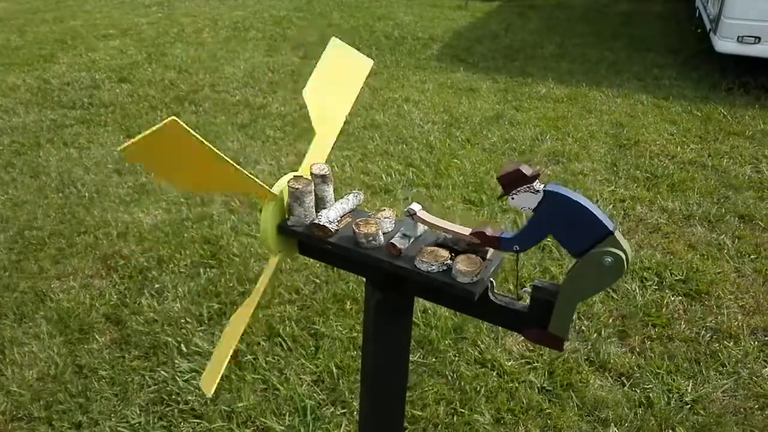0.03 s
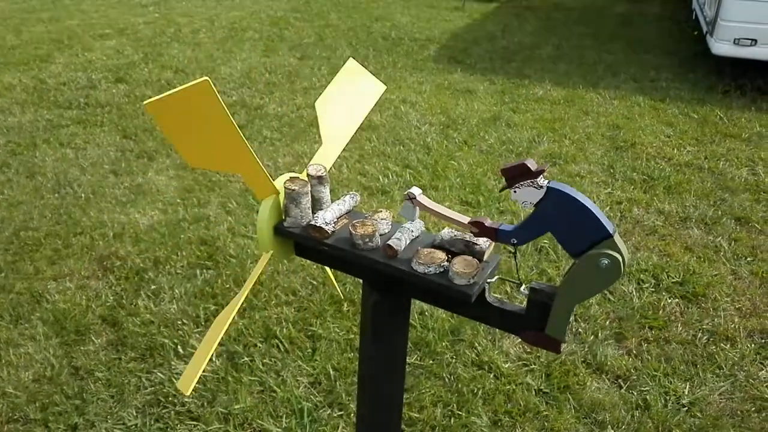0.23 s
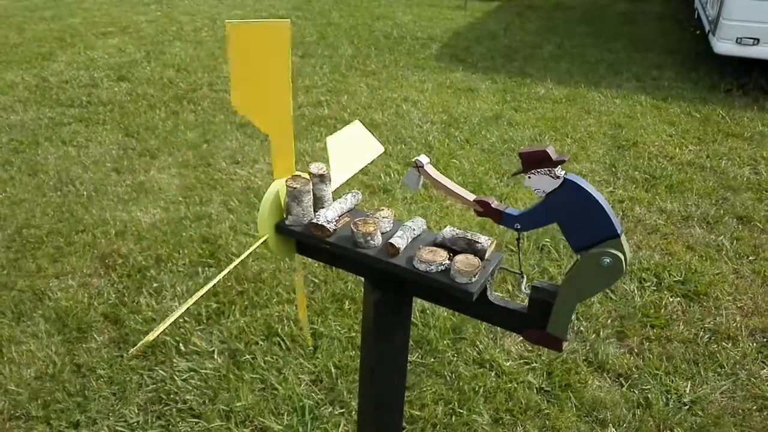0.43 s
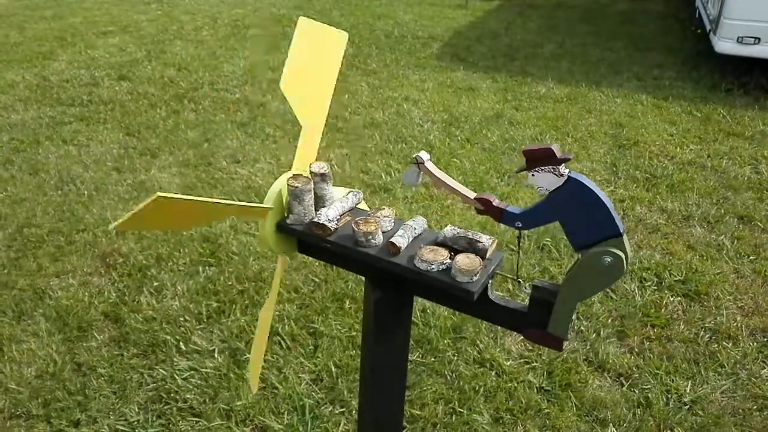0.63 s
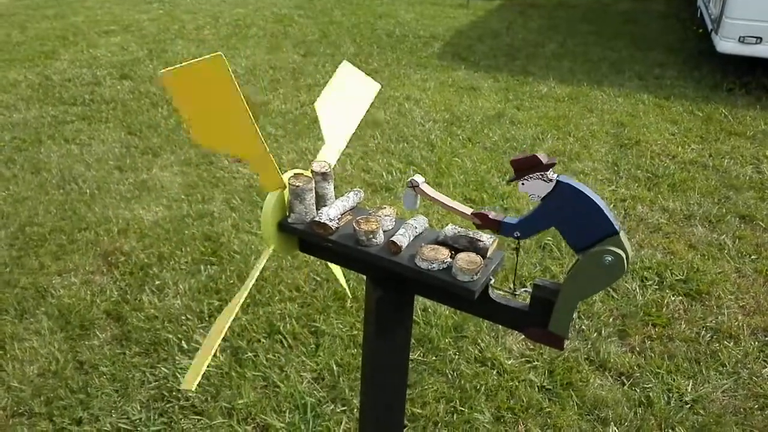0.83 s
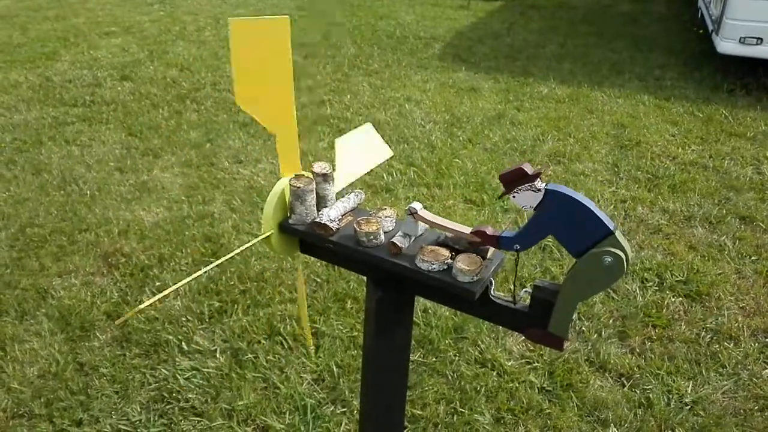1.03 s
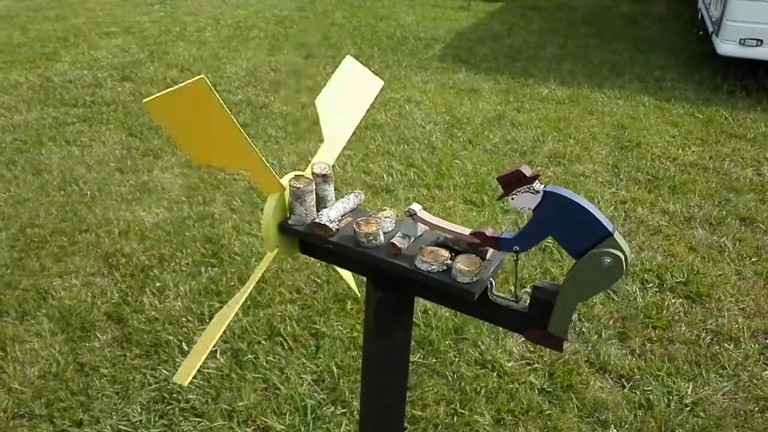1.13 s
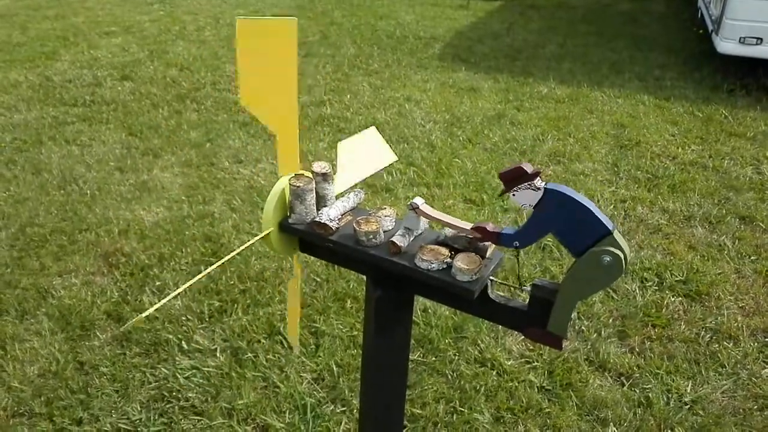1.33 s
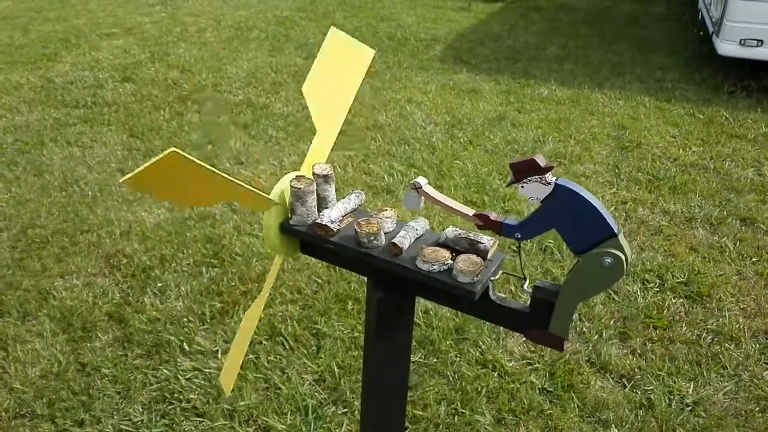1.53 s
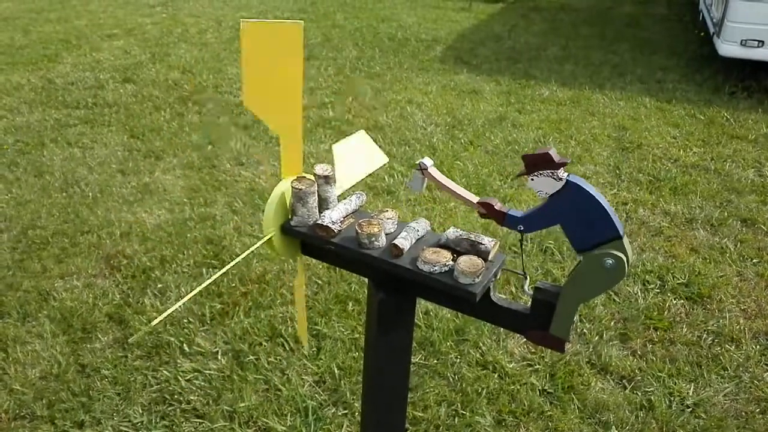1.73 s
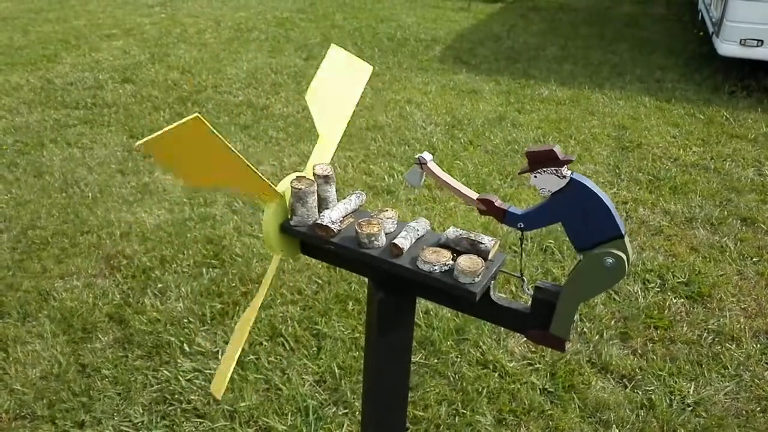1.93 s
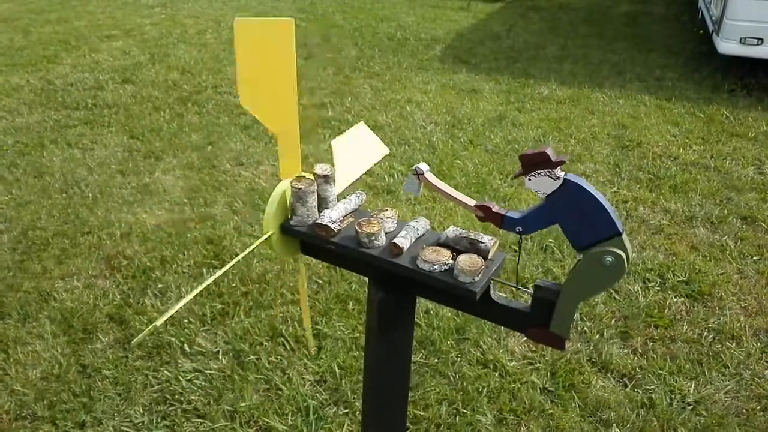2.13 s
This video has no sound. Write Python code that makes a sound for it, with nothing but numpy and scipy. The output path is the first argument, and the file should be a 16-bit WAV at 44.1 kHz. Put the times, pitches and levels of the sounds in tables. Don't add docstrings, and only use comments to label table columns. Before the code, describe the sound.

Wind buffeting bare microphones in low thumps and sharp slaps, over insect hiss and wooden clicks

```python
import sys
import numpy as np
from scipy import signal
from scipy.fft import rfft, irfft
from scipy.io import wavfile
from scipy.ndimage import uniform_filter1d, map_coordinates

SR = 44100
rng = np.random.default_rng(int(sys.argv[2]) if len(sys.argv) > 2 else 0)


def ratio_of_db(decibels):
    return 10 ** (np.asarray(decibels, float) / 20)


def generate_wav(sig):
    pcm = np.round(np.clip(np.atleast_2d(sig).T, -1, 1) * 32767).astype(np.int16)
    wavfile.write(sys.argv[1], SR, pcm)


N = 97020


def walk(rate):
    hold = int(SR / rate)
    levels = np.repeat(rng.standard_normal(N // 50), hold)[:N]
    return 1.3 * uniform_filter1d(uniform_filter1d(levels, hold), hold)


def band_noise(low_hz, high_hz, noise):
    return signal.sosfilt(signal.butter(2, [low_hz, high_hz], "band", fs=SR, output="sos"), noise)


def bands(table, wobble_db, rate, steps):
    swell_db, swell_rate = 0.25, 2.17
    hz = np.maximum(np.arange(N // 2 + 1) * SR / N, 1)
    f, db = np.array(table, float).T
    density = ratio_of_db(np.interp(np.log(hz), np.log(f), db))
    spec = rfft(rng.standard_normal(N)) * density * np.sqrt(SR / 2)
    place = np.log(hz / f[0]) / np.log(f[-1] / f[0]) * steps
    spec = spec * (place > -1) * (place < steps + 0.5)
    out = np.zeros(N)
    for k in range(steps + 1):
        share = np.clip(1 - abs(np.clip(place, 0, steps) - k), 0, 1)
        level = ratio_of_db(wobble_db * walk(rate) + swell_db * walk(swell_rate))
        out += irfft(spec * np.sqrt(share), N) * level
    return out


def traffic():
    # pitch_hz, density_db (per Hz)
    town = [(250, -91), (450, -98), (700, -87), (930, -94), (1080, -101), (1600, -101), (2500, -104.5),
            (4500, -108)]
    alike = 0.3
    mid = bands(town, 1.5, 12.76, steps=7)
    side = bands(town, 1.5, 12.76, steps=7)
    return np.sqrt((1 + alike) / 2) * mid + np.sqrt((1 - alike) / 2) * side * np.array([[1], [-1]])


def grass_insects():
    # pitch_hz, density_db (per Hz)
    hiss_left = [(4300, -106), (5000, -99), (5600, -88), (6600, -95), (9000, -101), (9700, -107),
                 (12500, -107), (14000, -104)]
    # pitch_hz, density_db (per Hz)
    hiss_right = [(5800, -108), (6300, -98), (7300, -94), (7800, -91), (8900, -84.5), (9400, -99.5),
                  (9900, -107), (14000, -114)]
    # pitch_hz, level_db
    whines = [
        (7063, -79.5),
    ]
    throb_db, throb_rate = 2.5, 35
    t = np.arange(N) / SR
    out = np.array([bands(hiss, throb_db, throb_rate, steps=10) for hiss in (hiss_left, hiss_right)])
    for hz, db in whines:
        out += ratio_of_db(db + 7.5 + 2 * walk(11.0)) * np.sin(2 * np.pi * hz * t)
    return out


def katydids():
    # pitch_hz, width_hz, level_db, rasps_per_s, a_rasp_at_s, duty (share of a cycle)
    rasps = [
        (7800, 190, -55, 12.6, 1.025, 0.3),
        (8900, 500, -56, 12.6, 0.99, 0.3),
        (8350, 400, -59, 12.6, 1.008, .3),
    ]
    t = np.arange(N) / SR
    out = np.zeros(N)
    for hz, width, db, rate, at, duty in rasps:
        band = band_noise(hz - width / 2, hz + width / 2, rng.standard_normal(N))
        turn = (rate * (t - at) + 0.054 * walk(6.7) + 0.5) % 1 - 0.5
        stroke = np.exp(-(2 * turn / duty) ** 2)
        out += ratio_of_db(db + 1.4 * walk(4.6)) * stroke * band / band.std()
    return out * np.array([[0.15], [1]])


def cicada():
    # centre_s, half_length_s, level_db, pitch_hz, width_hz
    swell = (1.03, .09, -55.5, 6400, 1100)
    at, half, db, hz, width = swell
    t = np.arange(N) / SR
    band = band_noise(hz - width / 2, hz + width / 2, rng.standard_normal((2, N)))
    return ratio_of_db(db) * np.exp(-((t - at) / half) ** 2) * band / band.std()


def whirligig_knocks():
    # start_s, level_db, body (0 dull, 1 bright)
    knocks = [
        (0.0127, -34, 0),
        (0.0207, -28.5, 1),
        (0.0232, -39.5, 1),
        (0.0409, -50, 1),
        (0.048, -45.5, 1),
        (1.106, -40.5, 0),
        (1.112, -46, 0),
        (1.125, -45.5, 0),
        (1.131, -46.5, 0),
        (1.143, -47, 1),
    ]
    # pitch_hz, level_db, t60_s
    dull_modes = [(845, -16, 0.066), (1556, -7.5, 0.048), (2117, -5, 0.011), (3820, -7, 0.014),
                  (4980, -9, 0.018)]
    # pitch_hz, level_db, t60_s
    bright_modes = [(540, -36, 0.075), (1175, -18.5, 0.055), (1760, -6, 0.016), (4110, -5.5, 0.022),
                    (5170, -1, 0.02), (6630, -1, 0.014), (7720, -3.5, 0.019)]
    low_pan_db, high_pan_db = 9, -9.5
    rattle_db, rattle_s, rattle_pan_db = 0.5, 0.004, 2
    rattle_top_hz = (4140, 8800)
    left_lag = 4
    sides = np.array([[0.5], [-0.5]])
    out, t = np.zeros((2, N)), np.arange(SR // 10) / SR
    for at, db, body in knocks:
        body = int(body > 0.5)
        seed = rng.standard_normal((2, len(t)))
        ring = 0
        for k, (hz, mode_db, t60) in enumerate((dull_modes, bright_modes)[body]):
            pan_db = low_pan_db if hz < 6000 else high_pan_db
            detuned = hz * (1 + 0.035 * seed[0, k])
            decay = np.exp(-np.log(1000) * t / t60)
            ring = ring + ratio_of_db(mode_db + pan_db * sides) * np.sin(2 * np.pi * detuned * t) * decay
        rattle = band_noise(900, rattle_top_hz[body], seed * np.exp(-t / rattle_s))
        i = int(at * SR)
        out[:, i:i + len(t)] += ratio_of_db(db) * (ring + ratio_of_db(rattle_db + rattle_pan_db * sides) * rattle)
    out[0] = np.roll(out[0], left_lag)
    return out


def squeaks():
    # centre_s, half_length_s, level_db, pitch_hz
    chirps = [(0.057, 0.0019, -39, 5200), (0.067, .004, -48, 5600), (0.046, .003, -43.5, 5300),
              (0.13, 0.0065, -60.5, 2900), (1.128, 0.0028, -50, 5660), (1.137, 0.0033, -54, 5600),
              (1.152, 0.0026, -48, 5600), (1.639, 0.0049, -52.5, 6400), (0.11, 0.01, -65.5, 2370),
              (2.4, 0.029, -67.5, 1573), (2.09, .012, -65, 1600), (2.13, 0.027, -69.5, 1700),
              (2.144, 0.0069, -63.5, 3380), (1.6, .005, -66, 3380), (1.9, 0.033, -69.5, 3800),
              (2.5, 0.018, -64.5, 1608)]
    pan_db, waver_rad = 11, 1.1
    t = np.arange(N) / SR
    out = np.zeros(N)
    for at, half, db, hz in chirps:
        level = ratio_of_db(db + 2 * walk(150)) * np.exp(-((t - at) / half) ** 2)
        out += level * np.sin(2 * np.pi * hz * t + waver_rad * walk(150))
    return out * ratio_of_db(np.array([[pan_db], [-pan_db]]) / 2)


def low_cut(x):
    cut_hz, width_hz = 71.1, 91.2
    w, q = 2 * np.pi * cut_hz, cut_hz / width_hz
    b, a = signal.bilinear([1, 0, 0], [1, w / q, w * w], SR)
    for _ in range(3):
        x = signal.lfilter(b, a, x)
    return x


def turbulence(puffs):
    calm_db, calm_hz, wind_db = -51.5, 119.72, -0.5
    corner_per_hz, corner_from_hz = 0.85, 50
    flutter_db, flutter_rate = 2.5, 130
    even, even_s = 0.78, 0.024
    t = np.arange(N) / SR
    s, half, db, hz = np.array(puffs, float).T[:, :, None]
    power = ratio_of_db(2 * db) * np.exp(-((t - s) / half) ** 2)
    total = power.sum(0) + ratio_of_db(2 * calm_db)
    pitch = ((power * hz).sum(0) + ratio_of_db(2 * calm_db) * calm_hz) / total
    speed = corner_per_hz * np.maximum(pitch - corner_from_hz, 10) * ratio_of_db(flutter_db * walk(flutter_rate))
    size = 2 ** 14
    fade = np.exp(-np.arange(size // 2 + 1) / size * 32)
    field = irfft(rfft(rng.standard_normal(size)) * fade, size)
    air = low_cut(map_coordinates(field, [np.cumsum(speed) * 32 / SR], mode="wrap"))
    span = int(even_s * SR)
    local = uniform_filter1d(uniform_filter1d(air ** 2, span), span) + 1e-12
    air = air / local ** (even / 2)
    slow = uniform_filter1d(air ** 2, SR // 2)
    return ratio_of_db(wind_db) * air * np.sqrt(total / slow)


def slaps(eddies):
    slap_db, edge = -23, 1.08
    t = np.arange(N) / SR
    out = np.zeros(N)
    for at, db, ms in eddies:
        lean = rng.uniform(0, 2 * np.pi)
        u = (t - at) * 1000 / max(ms, 0.05)
        out += ratio_of_db(db + slap_db) * (np.cos(lean) + np.sin(lean) * 2 * u) * np.exp(-edge * u * u)
    return low_cut(out)


def wind():
    # centre_s, half_length_s, level_db, eddy_pitch_hz
    left_puffs = [(0.255, 0.02, -28, 134), (0.339, 0.071, -34, 129.7), (0.408, 0.013, -35, 144.7),
                  (0.494, 0.014, -26.5, 146.4), (0.559, 0.022, -25.5, 125.6), (0.608, 0.022, -32.5, 115.3),
                  (0.749, 0.023, -17, 162.8), (0.854, 0.049, -17.5, 202.5), (0.969, 0.025, -20, 197),
                  (1.044, 0.018, -20, 191.4), (1.097, 0.018, -15.5, 232.6), (1.183, 0.097, -22, 239.5),
                  (1.274, 0.018, -18.5, 283.6), (1.321, 0.024, -14.5, 220.2), (1.368, 0.014, -13, 253.4),
                  (1.404, 0.014, -12.5, 312.1), (1.44, 0.006, -23.5, 231.9), (1.49, 0.019, -22.5, 215.3),
                  (1.541, 0.12, -40, 220.8), (1.585, 0.013, -37.5, 106.6), (1.677, 0.017, -14, 131.4),
                  (1.708, 0.045, -17.5, 132.7), (1.847, 0.029, -25, 144.4), (2.071, 0.018, -30, 129.7),
                  (2.127, 0.12, -38.5, 134.9), (2.147, 0.012, -31.5, 137)]
    # centre_s, half_length_s, level_db, eddy_pitch_hz
    right_puffs = [(0.055, 0.0091, -26.5, 132.5), (0.11, 0.056, -35, 128.2), (0.261, 0.02897, -20, 118.3),
                   (0.322, 0.007, -17, 229.9), (0.366, 0.018, -25.5, 142.9), (0.465, 0.046, -36.5, 125.7),
                   (0.575, 0.01215, -26.5, 91.74), (0.681, 0.011, -19, 118.4), (0.773, 0.011, -22.5, 107),
                   (0.788, 0.0958, -26, 119.7), (0.841, 0.01815, -28.5, 147), (1.027, 0.017, -20.5, 130.7),
                   (1.07, 0.0942, -28.5, 133.3), (1.079, 0.017, -27, 138.8), (1.24, 0.02326, -29.5, 125.4),
                   (1.376, 0.0125, -18, 308.7), (1.435, 0.01, -15, 243.3), (1.446, 0.091, -21.0, 235.7),
                   (1.477, 0.01228, -15.5, 256.7), (1.538, 0.01198, -21.5, 153),
                   (1.63, 0.017, -12.5, 132.2), (1.674, 0.013, -15.5, 162.6), (1.727, 0.03818, -30.5, 158),
                   (1.917, 0.014, -19.5, 136.7), (1.966, 0.1232, -29, 131.8), (2.188, 0.0072, -25, 109.5)]
    # centre_s, strength_db, width_ms
    left_slaps = [(0.752, 13, 0.81), (.817, 5.5, 0.46), (0.84, 7.5, 0.49), (0.848, 9, 0.51),
                  (0.861, 11, 0.78), (0.984, 8, 0.48), (1.054, 8.5, 0.64), (1.097, 8.5, 0.7),
                  (1.148, 1.5, 0.5), (1.215, 4.5, 0.5), (1.233, 2.5, 0.39), (1.267, 13.5, 0.56),
                  (1.298, 10, 0.44), (1.325, 12, 0.52), (1.344, 10.5, 0.55), (1.364, 14, 0.3),
                  (1.411, 17.5, 0.41), (1.42, 8.5, 0.43), (1.436, 10, 0.31), (1.475, 1.5, 0.53),
                  (.762, -11, 0.57), (.805, -4, 0.84), (.878, -4.5, 0.54), (.887, 1, 0.7), (.952, -3, 0.7),
                  (.963, 4, 0.74), (.992, -8, 0.51), (1.014, -8, 0.72), (1.065, 6, 0.49), (1.107, 2, 0.57),
                  (1.125, -10, .6), (1.136, 0.5, .55), (1.175, -6, 0.51), (1.19, -0.5, 0.64),
                  (1.224, 3, 0.61), (1.248, 9, 0.61), (1.253, 6.5, 0.48), (1.287, 7.5, 0.46),
                  (1.305, 2, 0.36), (1.316, 2.5, 0.39), (1.334, 2, 0.54), (1.356, 4, 0.4),
                  (1.378, 0.5, 0.73), (1.388, -13, 0.32), (1.394, 6, 0.44), (1.4, 13.5, 0.58),
                  (1.445, -7, 0.66), (1.501, -0.5, .7), (1.671, -11, 0.65), (1.691, -1.5, 0.67),
                  (1.71, -2, 0.68), (1.721, -4.5, 0.63), (1.854, -1.5, 0.69)]
    # centre_s, strength_db, width_ms
    right_slaps = [(0.247, -12, 0.85), (.31, -2, 0.74), (.3185, 5, 0.51), (.321, 11.5, 0.83),
                   (0.324, 17.5, 1.04), (0.364, 6.5, 1.27), (1.465, -5.5, 0.52), (1.495, -10, 0.72),
                   (1.505, -10, 0.87), (1.649, -1, .7), (1.675, -9, 0.84), (1.749, -13, 0.55),
                   (2.049, -9.5, 0.77), (2.128, -14.5, 0.62), (1.076, 7, 0.97), (1.347, 3.5, 0.66),
                   (1.377, 13, 0.51), (1.44, 7.5, 0.34), (1.473, 15.5, 0.59), (1.482, -18, 0.92),
                   (1.52, -7, 1.45), (1.637, 2, 0.76), (1.661, 6.5, 0.65), (1.684, 10, 0.96),
                   (1.715, -1, 0.64), (1.926, 2.5, 0.83)]
    left = turbulence(left_puffs) + slaps(left_slaps)
    right = turbulence(right_puffs) + slaps(right_slaps)
    return np.array([left, right])


def scene():
    background = traffic() + grass_insects() + katydids() + cicada()
    return background + whirligig_knocks() + squeaks() + wind()


def thin_out(x):
    # pitch_hz, threshold_db
    thrift = [(850, -25), (1100, 2), (2500, 4.5), (4600, 5), (5200, -6), (9300, -9), (9900, 5),
              (14000, 3.5)]
    f, _, lines = signal.stft(x, SR, "cosine", 2048)
    usual = uniform_filter1d(np.median(abs(lines), axis=2), size=15, axis=1)
    bar = usual * ratio_of_db(np.interp(f, *np.array(thrift).T))
    return signal.istft(lines * (abs(lines) > bar[:, :, None]), SR, "cosine", 2048)[1][:, :N]


def band_limit(x):
    return signal.sosfilt(signal.butter(12, 14340, fs=SR, output="sos"), x)


def record(dry):
    top_hz, gap_low_hz, gap_high_hz, gap_db = 14340, 11050, 11750, -32.5
    hz = np.arange(N // 2 + 1) * SR / N
    in_gap = (hz > gap_low_hz) & (hz < gap_high_hz)
    keep = (hz < top_hz) * np.where(in_gap, ratio_of_db(gap_db), 1)
    mix = irfft(rfft(thin_out(dry)) * keep, N)
    return band_limit(mix)


dry = scene()
out = record(dry)
generate_wav(out)
```